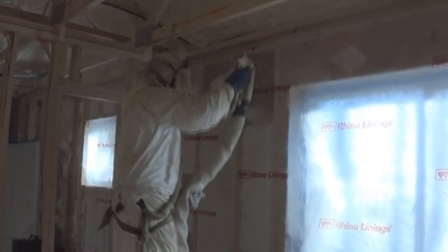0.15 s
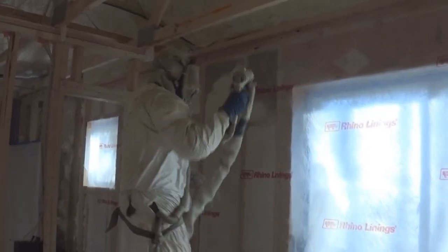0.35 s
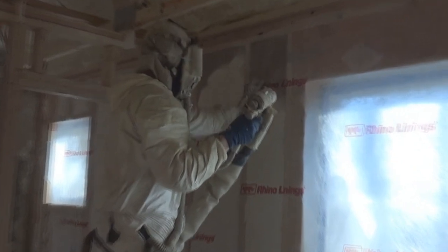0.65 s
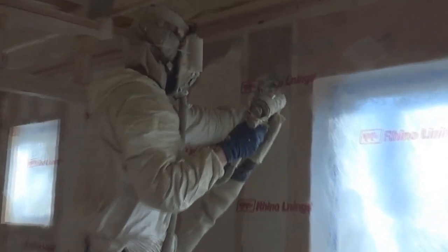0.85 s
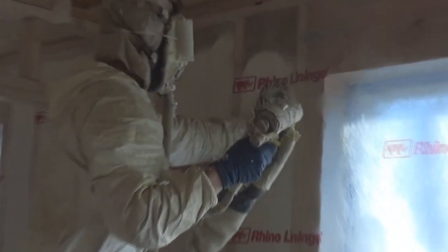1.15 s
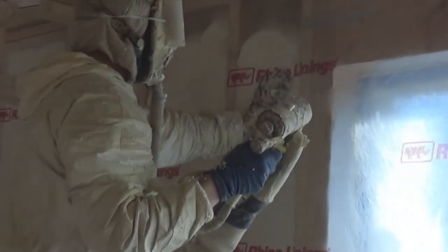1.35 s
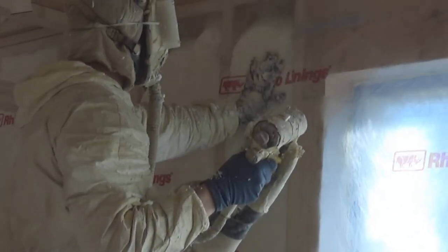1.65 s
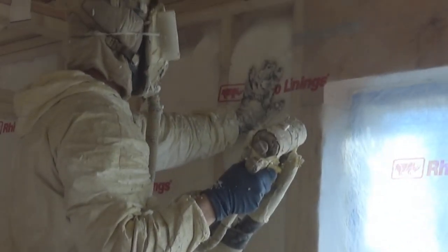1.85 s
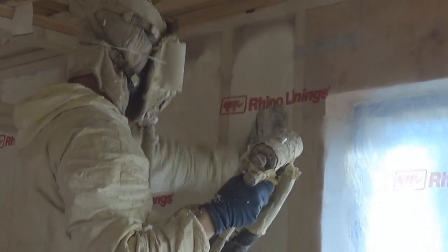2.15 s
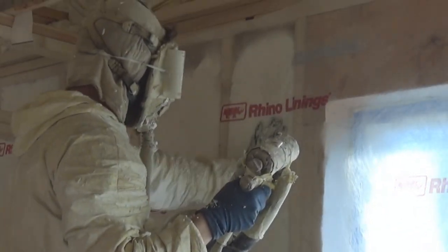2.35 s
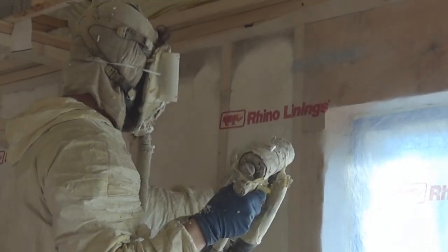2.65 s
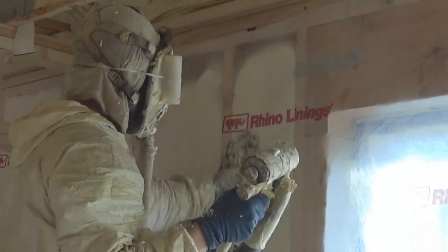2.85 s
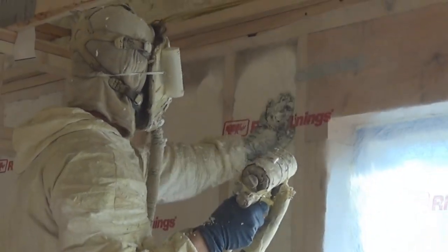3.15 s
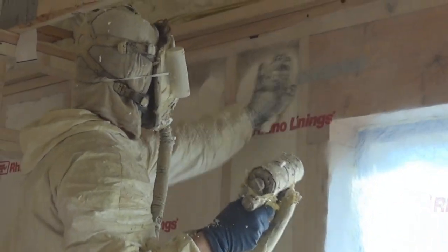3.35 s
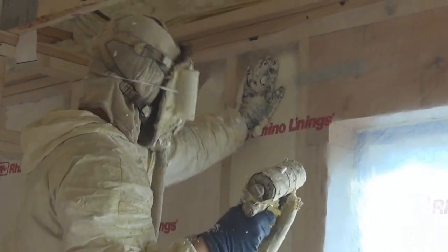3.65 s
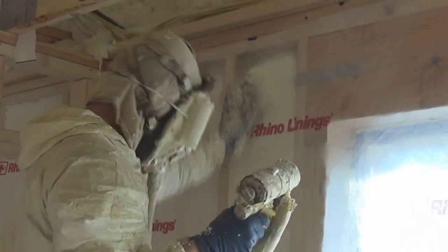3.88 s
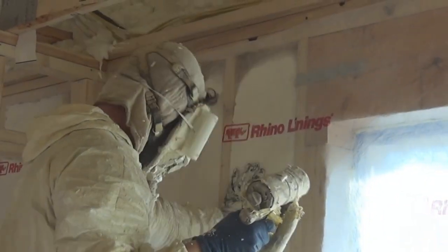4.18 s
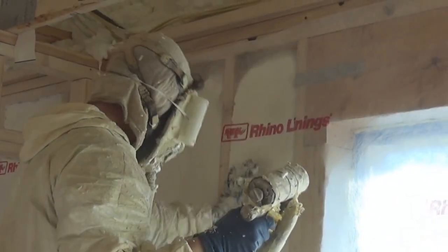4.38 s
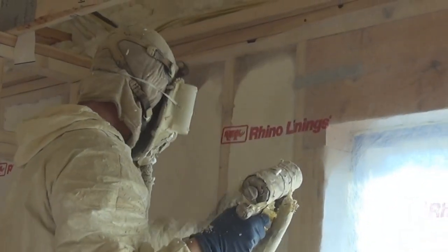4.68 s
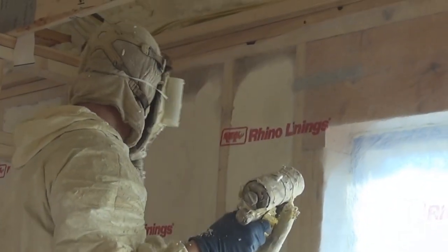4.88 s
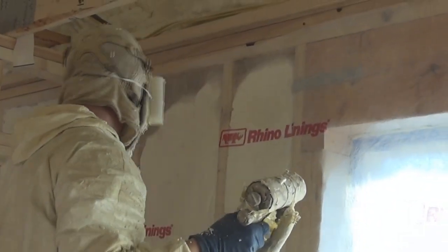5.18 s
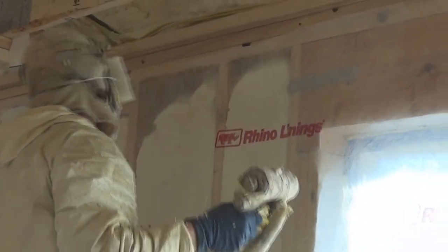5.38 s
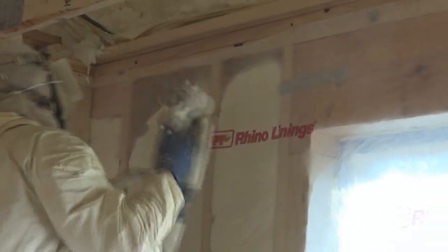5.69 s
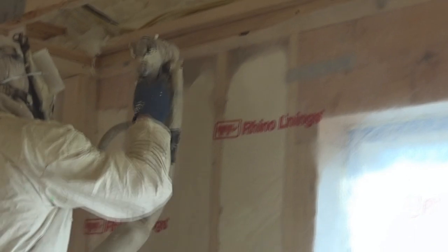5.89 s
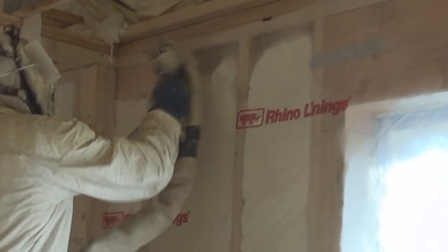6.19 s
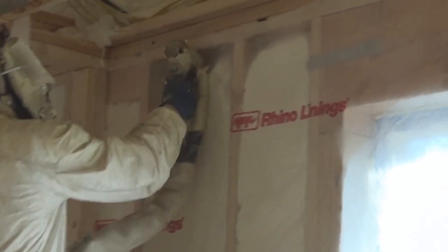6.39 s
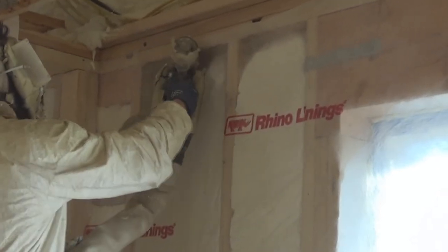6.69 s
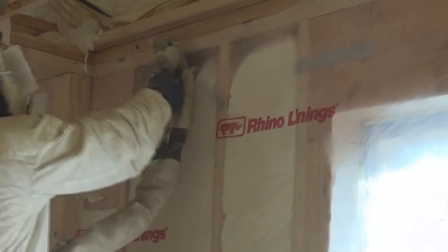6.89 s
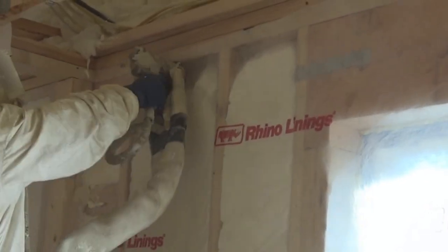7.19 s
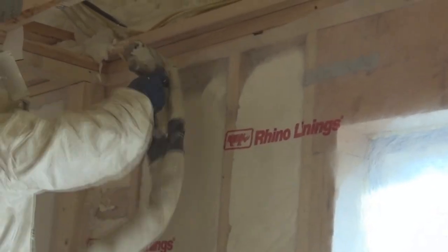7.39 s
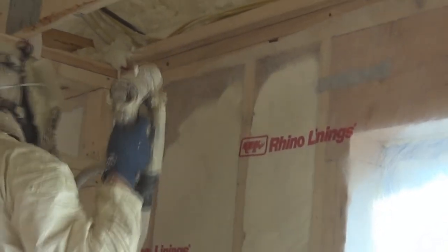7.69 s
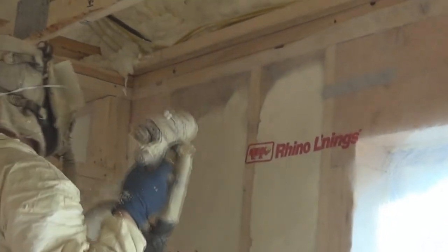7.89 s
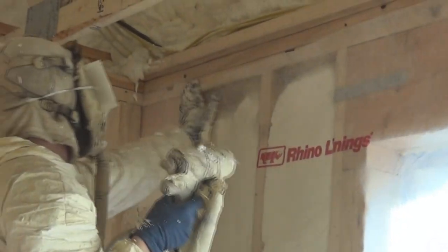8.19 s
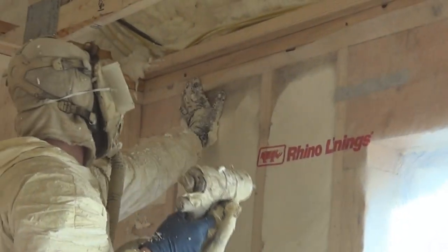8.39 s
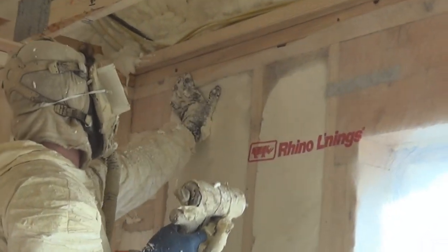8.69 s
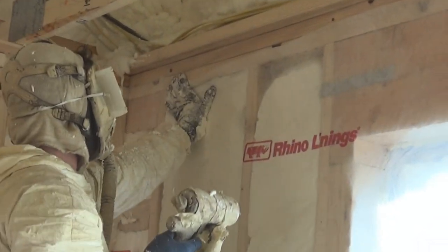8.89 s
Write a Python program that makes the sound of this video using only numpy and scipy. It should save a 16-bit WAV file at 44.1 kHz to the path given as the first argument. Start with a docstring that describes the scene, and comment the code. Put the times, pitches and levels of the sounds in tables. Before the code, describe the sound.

A foam spray gun hisses air steadily, with a hard knock on timber framing and a brief burst of duller spray.

```python
"""A foam gun hisses purge air in a bare timber-framed room, over a low rumble and a machine's far hum.
It first rests by the worker's chest; gun and hose tap the framing and boots thud softly on the floor.
Near six seconds it rises to the wall: the jet roars in the stud cavity and one hard knock rings the frame.
The trigger swaps the hiss for half a second of duller spray, then the valve snaps shut with a spit.
After a last clatter the gun draws back, still blowing air."""
import sys
import numpy as np
from scipy import signal
from scipy.io import wavfile
from scipy.ndimage import uniform_filter1d

SR = 44100
rng = np.random.default_rng(int(sys.argv[2]) if len(sys.argv) > 2 else 0)


def waveform_to_disk(signal):
    """Save audio, clipped to [-1, 1], as 16-bit WAV at the path in sys.argv[1]."""
    frames = np.transpose(np.atleast_2d(signal))
    scaled = np.clip(frames, -1, 1) * 32767
    samples = np.round(scaled).astype(np.int16)
    wavfile.write(sys.argv[1], SR, samples)


N = 398663
TIME = np.arange(N) / SR
FRAME_S = np.arange(N // 256 + 5)[:, None] * 256 / SR  # time axis of the noise colours
BIN_HZ = np.fft.rfftfreq(1024, 1 / SR)  # and their frequency axis
TRIGGER_ON_S, TRIGGER_OFF_S = 6.886, 7.375


def gain_of(db):
    """Decibels to amplitude."""
    return 10 ** (np.asarray(db) / 20)


def unit_rms(x):
    """Scales to an rms of one."""
    return x / np.sqrt(np.mean(x ** 2) + 1e-20)


def spectrum(points, hz=BIN_HZ):
    """A curve over frequency, its points joined on a log axis."""
    f, value = np.transpose(points)
    return np.interp(np.log(hz + 1), np.log(f + 1), value)


def bell(hz, width_hz):
    """A bell-shaped resonance of height one."""
    return np.exp(-2 * ((BIN_HZ - hz) / width_hz) ** 2)


def add(mix, s, sound):
    """Lays a stereo sound into the mix at time s."""
    part = mix[:, round(s * SR):][:, :sound.shape[1]]
    part += sound[:, :part.shape[1]]


def wobble(samples):
    """Random modulation of unit rms, smoothed over so many samples."""
    return unit_rms(uniform_filter1d(rng.standard_normal(N), size=samples))


def patches(frames, bins):
    """Random shimmer over time and frequency, in patches of the given size."""
    field = uniform_filter1d(rng.standard_normal((len(FRAME_S), len(BIN_HZ))), frames, axis=0)
    return unit_rms(uniform_filter1d(field, bins, axis=1, mode="wrap"))


def spread(radians):
    """Standing waves in the room put a tone slightly out of phase between left and right."""
    return radians * rng.choice([-1, 1]) * np.array([[1], [-1]])


def noise(colour_db):
    """Stereo noise of unit rms; its colour may move while its level holds."""
    # narrowness of the stereo image: f/Hz, left-right correlation
    correlation = [(40, .97), (120, 1), (250, 1), (700, 0.96), (1400, 0.91), (3000, 0.85), (8000, 0.91),
                   (15000, 1)]
    alike = spectrum(correlation)
    a, b, c, d = rng.standard_normal((4, len(FRAME_S), len(BIN_HZ)))
    left = a + 1j * b
    right = alike * left + np.sqrt(1 - alike ** 2) * (c + 1j * d)
    colour = gain_of(colour_db)
    colour /= np.linalg.norm(colour, axis=-1, keepdims=True)
    frames = (np.array([left, right]) * colour).swapaxes(1, 2)
    return unit_rms(signal.istft(frames, nperseg=1024, noverlap=768)[1][:, :N])


def closeness(t):
    """How near the hand holds the gun to the wall."""
    # the arm's gesture: t/s, closeness (0-1)
    reach = [(0, 0.52), (.3, 0.38), (.5, .66), (.72, 0.24), (1.6, 0.16), (5.65, .16), (5.9, 0.4),
             (6.22, .85), (6.7, 0.5), (7.27, 1), (7.42, .7), (7.75, 0.58), (7.95, 0.21), (8.4, 0.05),
             (8.6, 0.23), (9.04, 0.01)]
    return np.interp(t, *np.transpose(reach))


def machine_hum(hz=60.56, waver=0.00628, far_db=-62, close_db=6.5):
    """A machine drones beyond the walls, its speed wavering; it swells as the gun nears the wall."""
    # hum partials: multiple of the machine's speed, level/dB
    partials = [(1, -21), (2, 0.5), (3, -5), (6.68, -8.5)]
    turns = np.cumsum(hz * (1 + waver * wobble(6000))) / SR
    hum = sum(gain_of(db) * np.sin(2 * np.pi * (k * turns + rng.random()) + spread(0.049))
              for k, db in partials)
    return unit_rms(hum) * gain_of(far_db + close_db * closeness(TIME))


def work_rumble(far_db=-64, close_db=9, still_db=-7, still_at_s=5.05, still_half_s=0.47):
    """A low bed of work noise that swells near the wall and sinks while the worker stands still."""
    # rumble colour: f/Hz, level/dB
    lows = [(20, -20), (35, -1), (55, -6), (75, -11), (110, 6.5), (160, -1), (260, -1.5), (420, -12),
            (800, -33), (2000, -50)]
    lull = np.exp(-((TIME - still_at_s) / still_half_s) ** 2)
    return noise(spectrum(lows)) * gain_of(far_db + close_db * closeness(TIME) + still_db * lull)


def boot_thuds(attack_s=0.0042, t60=0.19, blur_db=-4):
    """Each footfall sets off a low, short ring in the floor deck, blurred by the room."""
    # weight landing on the deck: t/s, strength/dB, ring f/Hz
    thuds = [(0.35, -44, 166), (0.441, -47, 111), (3.76, -52, 85), (3.904, -46, 95), (3.94, -46, 95),
             (4.046, -43.5, 151), (4.17, -44, 135), (4.473, -43.5, 146), (4.529, -46, 160),
             (4.592, -39.5, 150), (6.441, -31, 139.3), (7.543, -38, 236), (7.575, -38, 148),
             (7.73, -46, 135)]
    t, out = np.arange(SR // 2) / SR, np.zeros((2, N))
    attack = 1 - np.exp(-t / attack_s)
    for s, db, hz in thuds:
        band = signal.butter(2, [hz / 1.5, hz * 1.5], "bandpass", fs=SR, output="sos")
        blur = unit_rms(signal.sosfilt(band, rng.standard_normal(len(t))))
        ring = np.sin(2 * np.pi * hz * t + spread(0.14))
        add(out, s, gain_of(db - 60 * t / t60) * attack * (ring + gain_of(blur_db) * blur))
    return out


def frame_knocks(modes_db=-9, boards_db=-10, boards_t60=0.35, crack_db=-13, crack_t60=0.014, low_hz=105):
    """Each blow rings the timber frame and the boards on it; soft blows lose the treble."""
    # gun and hose striking the framing: t/s, strength/dB, hardness as a cut-off f/Hz
    blows = [(0.003, -39, 4000), (0.353, -40, 900), (0.455, -49, 600), (1.896, -42.5, 500),
             (2.176, -40.5, 503), (2.79, -41, 500), (4.046, -45, 1500), (4.592, -42, 1800),
             (4.91, -43.5, 1797), (6.176, -35, 900), (6.397, -13, 1900), (7.412, -41, 350),
             (7.508, -35, 3000), (7.519, -29, 3400), (7.545, -38, 380), (7.569, -38.5, 3400)]
    # modes of the frame: f/Hz, level/dB, t60/s
    modes = [(245, -5, 0.17), (292, -7, 0.31), (332, -1.5, .24), (413, -7.5, 0.32), (465, -5.5, 0.26),
             (524, -6, 0.29), (650, -19, .14), (1140, -8, .1), (1370, -26, .15)]
    # dense ring of the sheathing: f/Hz, level/dB
    sheathing = [(50, -40), (110, 0), (200, 0), (330, -1.5), (600, 1), (850, -6.5), (1500, -6.5),
                 (2100, -12), (4000, -38)]
    t, out = np.arange(SR // 2) / SR, np.zeros((2, N))
    ring = sum((-1) ** k * gain_of(db - 60 * t / t60) * np.sin(2 * np.pi * hz * t + spread(0.2))
               for k, (hz, db, t60) in enumerate(modes))
    boards = noise(spectrum(sheathing))
    decay = gain_of(boards_db - 60 * t / boards_t60) + gain_of(crack_db - 60 * t / crack_t60)
    for s, db, hard_hz in blows:
        blow = gain_of(modes_db) * ring + decay * boards[:, round(s * SR):][:, :len(t)]
        band = signal.butter(2, [low_hz, hard_hz], "bandpass", fs=SR, output="sos")
        add(out, s, gain_of(db) * signal.sosfilt(band, blow))
    return out


def echo_comb(count=32, strength=0.68, shortest_m=0.4, longest_m=6, reach_m=1.1, drift_m_per_s=0.0802):
    """Echoes off studs, ceiling and body comb the noise; the comb (dB) slides as the gun moves."""
    arm_travel = np.cumsum(abs(np.gradient(closeness(FRAME_S), axis=0)), axis=0)
    travel_m = reach_m * arm_travel + drift_m_per_s * FRAME_S
    comb = 1
    for place, heading, sign in rng.uniform(-1, 1, (count, 3)):
        detour_m = shortest_m + (longest_m - shortest_m) * abs(place) + heading * travel_m / 2
        echo = np.exp(-2j * np.pi * BIN_HZ * detour_m / 343)  # sound travels 343 m/s
        comb = comb + np.sign(sign) * strength / np.sqrt(count) * echo
    return 20 * np.log10(abs(comb) + 0.1)


def body_pocket(rest_from_s=0.77, lowered_at_s=3.7, rest_to_s=5.68, settle_s=0.3):
    """The hollow between body and wall colours (dB) the resting gun, at chest height and then lower."""
    # peaks and dips of the hollow: f/Hz, width/Hz, level/dB at the chest, level/dB once lowered
    resonances = [(899.2, 71, -4, -1.5), (1235, 115, 4, 6), (1440, 150, -3, -3.5), (3120, 290, 1.5, -4),
                  (3480, 620, 0, 2.5), (7530, 250, -2, -0.5), (8350, 610, 1.5, 0)]
    resting = np.clip(np.minimum(FRAME_S - rest_from_s, rest_to_s - FRAME_S) / settle_s, 0, 1)
    lowered = np.clip((FRAME_S - lowered_at_s) / settle_s, 0, 1)
    return resting * sum((chest_db + (low_db - chest_db) * lowered) * bell(hz, width_hz)
                         for hz, width_hz, chest_db, low_db in resonances)


def gap_swishes(width_share=0.11, octave_share=0.2):
    """The jet sweeps past a glove or stud and the gap rings: a gliding peak (dB) with a faint octave. One brief
    ring near 6.8 s comes as the finger takes up the trigger."""
    # passes of the jet, and a brief ring as the trigger is taken up near 6.8 s: start t/s, length/s, start
    # f/Hz, end f/Hz, lift/dB
    passes = [(0.778, 0.28, 3020, 3000, 4.5), (1.251, 1.03, 5100, 5600, 4.5), (3.5, 0.71, 5300, 4700, 6),
              (5.42, 0.12, 4900, 5100, 7), (5.59, 0.086, 4650, 4700, 7), (5.56, 0.25, 7100, 7800, 3),
              (6.15, 0.67, 2950, 3000, 5.5), (6.79, 0.046, 3630, 3650, 8), (7.485, 0.066, 1990, 1920, 12),
              (8.45, 0.43, 5460, 5600, 3.5)]
    colour_db = 0
    for start, length, from_hz, to_hz, lift_db in passes:
        progress = np.clip((FRAME_S - start) / length, 0, 1)
        hz = from_hz + (to_hz - from_hz) * progress
        ring = bell(hz, width_share * hz) + octave_share * bell(2 * hz, width_share * hz)
        colour_db += lift_db * np.sqrt(abs(np.sin(np.pi * progress))) * ring
    return colour_db


def wall_roar(room_db, far_db=-56.5, close_db=15, flutter_db=1.5):
    """The jet breaks on the wall into larger, lower eddies, louder the closer the gun."""
    # roar in the stud cavity: f/Hz, level/dB
    roar = [(50, -35), (120, -11), (220, -5), (340, -4.5), (450, -3), (550, -1.5), (750, -0.3),
            (1200, -2.5), (1900, -6), (3000, -7.5), (5000, -40)]
    level_db = far_db + close_db * closeness(TIME) + flutter_db * wobble(1500)
    return gain_of(level_db) * noise(spectrum(roar) + room_db)


def valve_snap(spit_db=-25, spit_t60=0.22, spit_rise_s=0.012):
    """As the trigger is let go, the valve snaps shut and air spits the nozzle clear."""
    # modes of the valve: f/Hz, level/dB, t60/s
    modes = [(1850, -30, 0.049), (3080, -32, .04), (5260, -31, .08), (10450, -24, .1)]
    t = np.maximum(TIME - TRIGGER_OFF_S, 0)
    ring = sum(gain_of(db - 60 * t / t60) * np.sin(2 * np.pi * hz * t) for hz, db, t60 in modes)
    spit = noise(spectrum([(600, -23), (2000, -12), (10000, 5), (16000, -7)]))  # f/Hz, level/dB
    return ring + np.minimum(t / spit_rise_s, 1) * gain_of(spit_db - 60 * t / spit_t60) * spit


def foam_spray(room_db, start_db=-33.5, build_db=2.5, sputter_db=0.5):
    """Liquid in the nozzle damps the hiss and makes it sputter; flow builds while the trigger is held."""
    # spray colour: f/Hz, level/dB
    spray = [(600, -28), (1500, -15), (2800, -8.5), (4200, -8.5), (5300, -8.5), (6700, -6), (8400, 0),
             (10000, -2), (11600, -4), (13000, -10), (15800, -18)]
    held = np.interp(TIME, [TRIGGER_ON_S, TRIGGER_OFF_S], [0, 1])
    level_db = start_db + build_db * held + sputter_db * wobble(200)
    return gain_of(level_db) * noise(spectrum(spray) + room_db)


def air_jet(room_db, far_db=-27.5, close_db=0.1, nozzle_db=5.5, width_hz=1500, top_db_per_hz=0.0035):
    """Turbulent hiss with a broad nozzle resonance, brightening as that resonance rises."""
    # hiss colour: f/Hz, level/dB
    hiss = [(400, -45), (1100, -22.5), (1500, -18), (2100, -13.5), (3000, -10.5), (4200, -9.5), (5500, -6),
            (7000, -3.5), (8000, 0), (8700, 2.5), (10000, -2), (12000, -8), (14000, -12.5), (15800, -19)]
    # drift of the nozzle resonance: t/s, f/Hz
    nozzle = [(0.0, 8650), (0.55, 8840), (2.16, 8700), (2.29, 9040), (4.03, 8600), (4.25, 8270),
              (6.42, 8900), (6.7, 8700), (7.5, 9000), (9.04, 8840)]
    # brief turns of the wrist that tilt the hiss: t/s, half length/s, body level/dB, top level/dB
    wrist_turns = [(0.153, 0.14, 0, 1.5), (1.65, .2, -0.5, 0.5), (4.398, 0.2, 0.3, -1.8),
                   (6.148, .2, -1.5, 2), (8.404, 0.11, -1.5, -2.5), (8.978, .13, -4, 0)]
    nozzle_hz = np.interp(FRAME_S, *np.transpose(nozzle))
    usual_hz = np.median(nozzle_hz)
    colour_db = spectrum(hiss) + room_db
    colour_db += nozzle_db * (bell(nozzle_hz, width_hz) - bell(usual_hz, width_hz))
    # from closeness 0.4 the nozzle faces the wall squarely, which throws back more top and body
    top_db = np.interp(closeness(FRAME_S), [0, 0.4], [-1, 0.9])
    body_db = np.interp(closeness(FRAME_S), [0, 0.4], [-0.97, 2.02])
    # the jet is beamed, so every small sway of the hand changes its colour
    jitter = rng.standard_normal((2,) + FRAME_S.shape)
    top_sway, body_sway = unit_rms(uniform_filter1d(jitter, size=14, axis=1))
    top_db += 0.7 * top_sway + top_db_per_hz * (nozzle_hz - usual_hz)
    body_db += 0.6 * body_sway
    for s, half_s, body_tilt_db, top_tilt_db in wrist_turns:
        turned = np.exp(-((FRAME_S - s) / half_s) ** 2)
        body_db += body_tilt_db * turned
        top_db += top_tilt_db * turned
    colour_db += top_db * spectrum([(9500, 0), (12500, 1)])  # high shelf
    colour_db += body_db * spectrum([(4500, 1), (7000, 0)])  # low shelf
    colour_db += 0.7 * patches(frames=18, bins=16)
    return gain_of(far_db + close_db * closeness(TIME)) * noise(colour_db)


def foam_gun(linger_s=0.0094, pan_db=-1.14, pan_close_db=1.0):
    """The trigger crossfades from air to foam and back, each lingering briefly in the room."""
    room_db = echo_comb() + body_pocket() + gap_swishes()
    trigger = (TIME > TRIGGER_ON_S) & (TIME < TRIGGER_OFF_S)
    pole = np.exp(-1 / (linger_s * SR))
    foam_share = np.clip(signal.lfilter([1 - pole], [1, -pole], trigger), 0, 1)
    jet = np.sqrt(1 - foam_share) * air_jet(room_db) + np.sqrt(foam_share) * foam_spray(room_db)
    left_db = pan_db + pan_close_db * closeness(TIME)  # reaching out moves the gun leftwards
    pan = gain_of(np.array([[0.5], [-0.5]]) * left_db)
    return (jet + wall_roar(room_db) + valve_snap()) * pan


def scene():
    """The gun up front, knocks and boots around it, hum and rumble underneath."""
    return foam_gun() + frame_knocks() + boot_thuds() + machine_hum() + work_rumble()


def record(dry, threshold_db=-24.5, recovery_db_per_s=39, top_hz=15860):
    """A limiter ducks the mix under a hard knock; a steep low-pass trims the very top."""
    power_db = 10 * np.log10(abs(uniform_filter1d((dry ** 2).mean(0), size=500)) + 1e-12)
    release_db = TIME * recovery_db_per_s
    peak_db = np.maximum.accumulate(power_db + release_db) - release_db
    duck_db = np.maximum(peak_db - threshold_db, 0)
    low_pass = signal.firwin(511, top_hz, window=("kaiser", 9), fs=SR)
    return signal.oaconvolve(dry / gain_of(duck_db), low_pass[None], "same")


dry = scene()
out = record(dry)
waveform_to_disk(out)
```